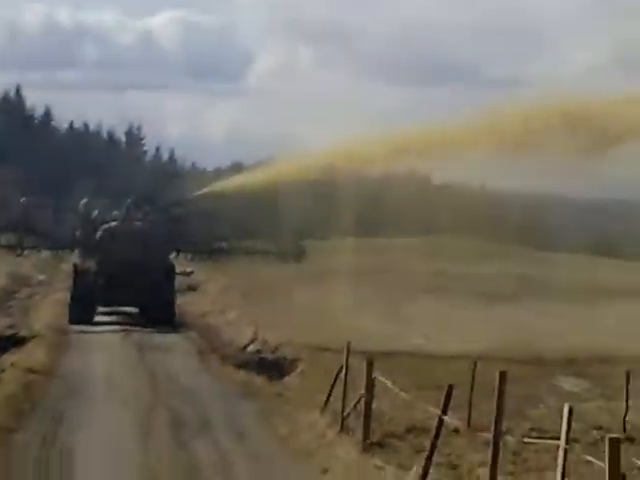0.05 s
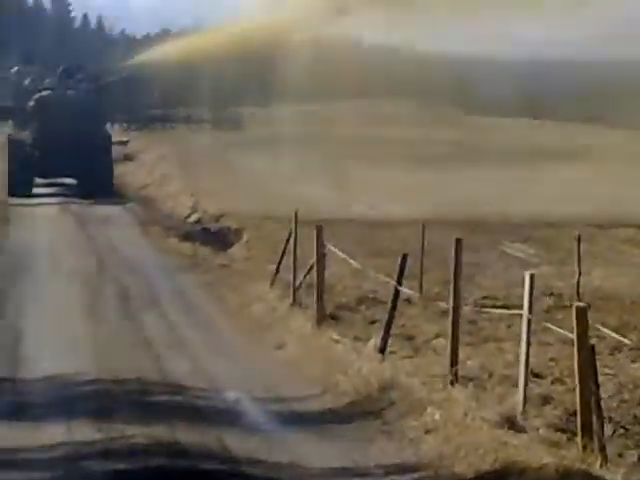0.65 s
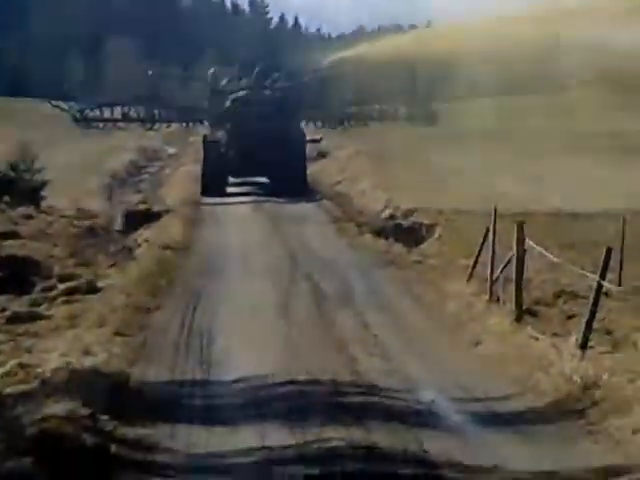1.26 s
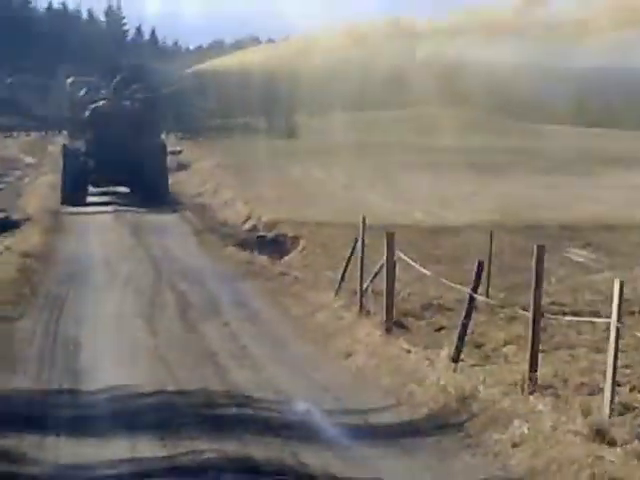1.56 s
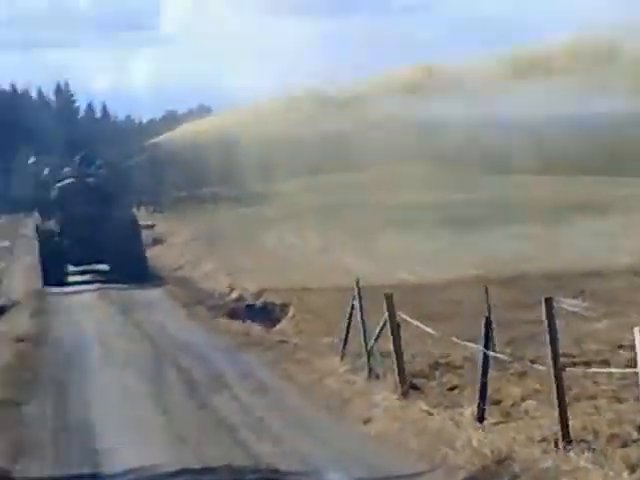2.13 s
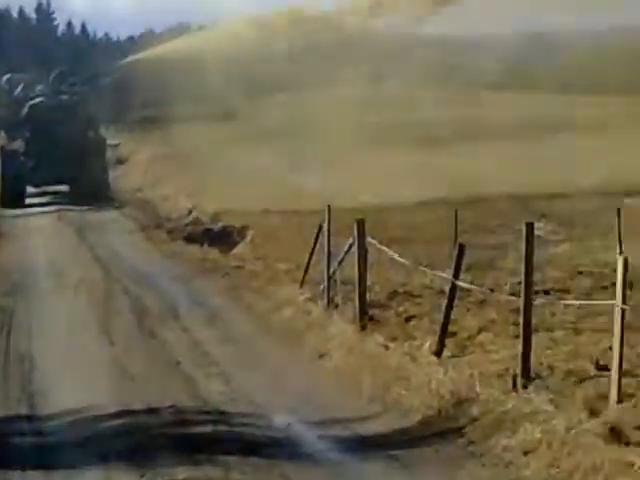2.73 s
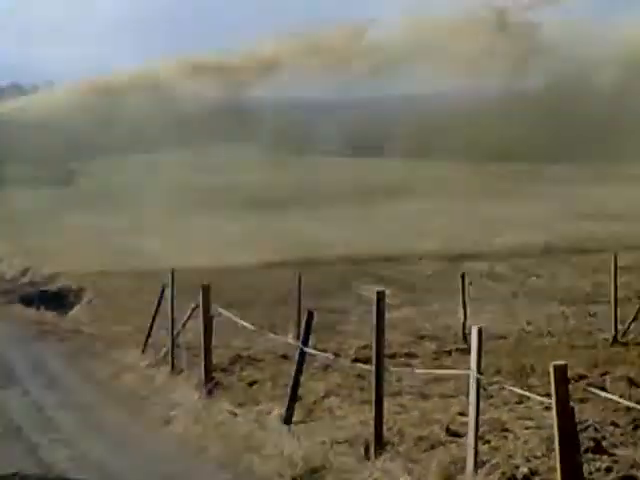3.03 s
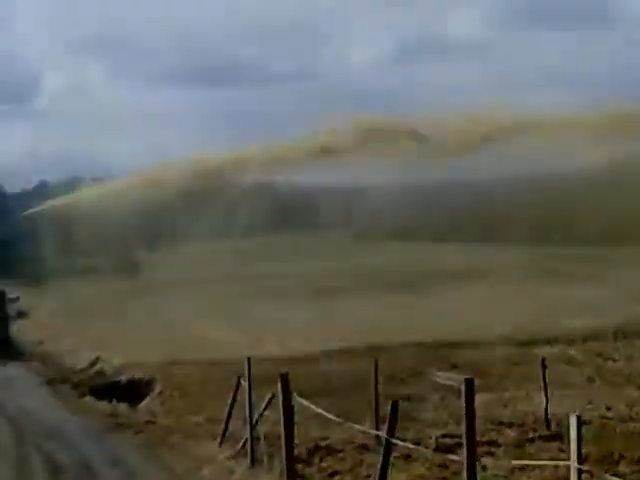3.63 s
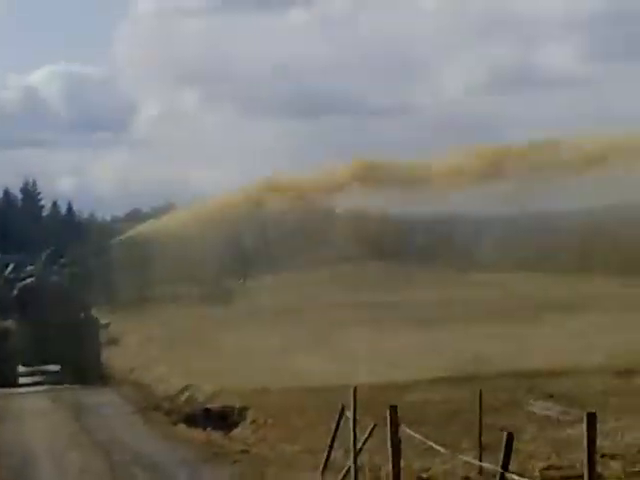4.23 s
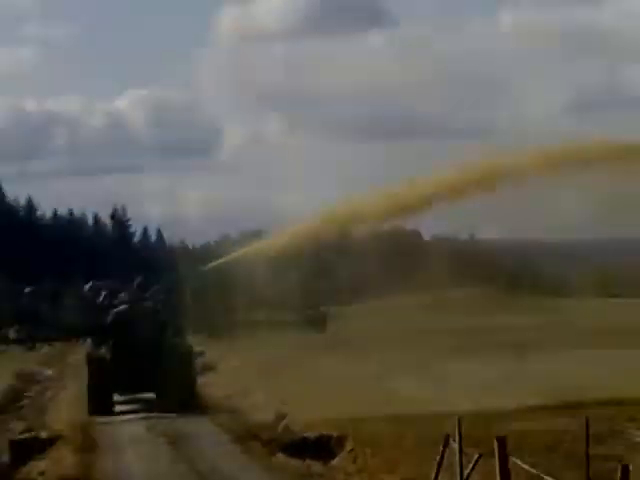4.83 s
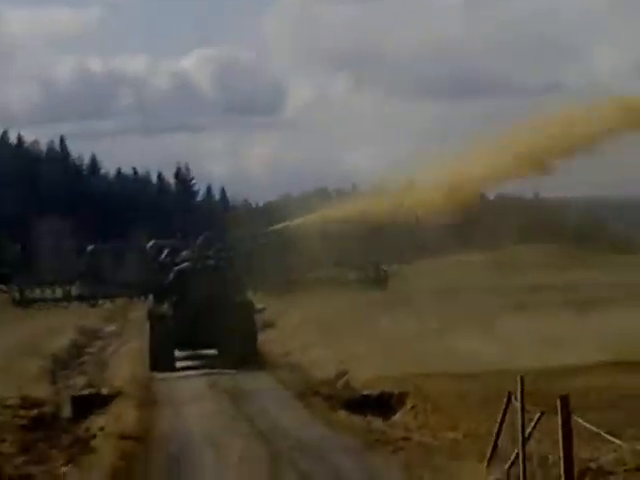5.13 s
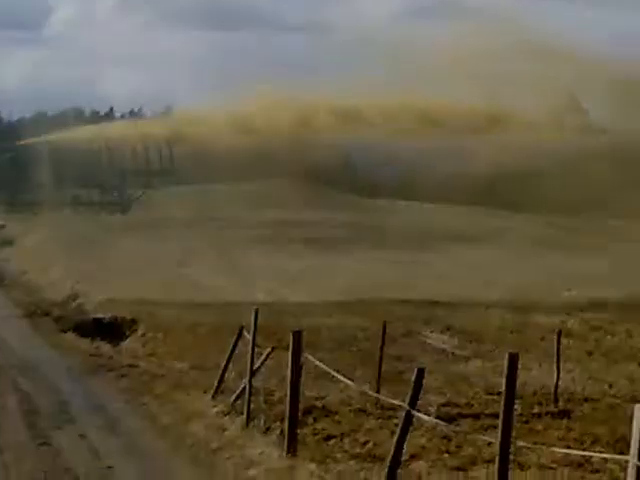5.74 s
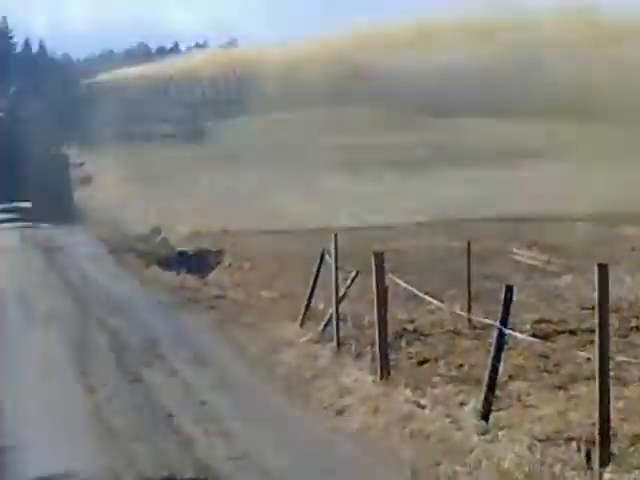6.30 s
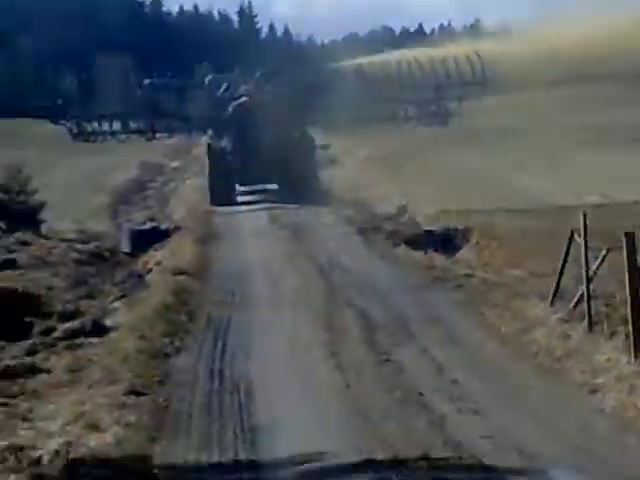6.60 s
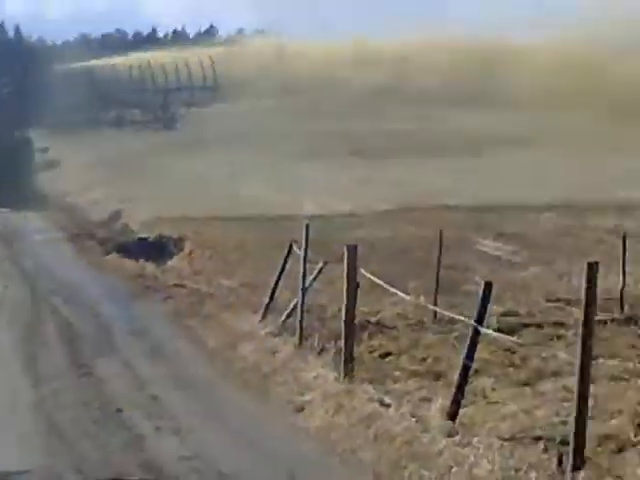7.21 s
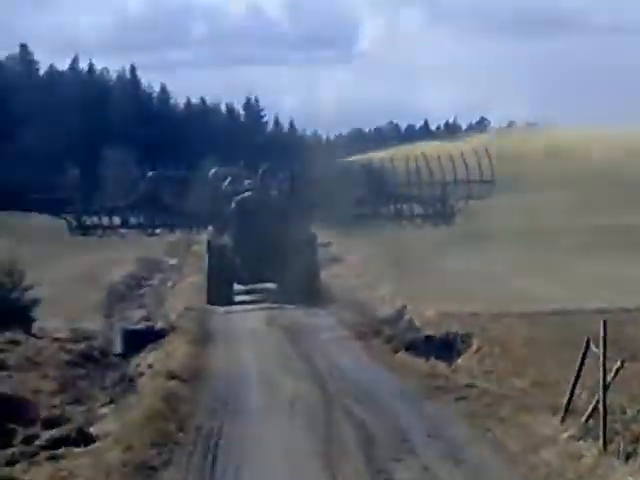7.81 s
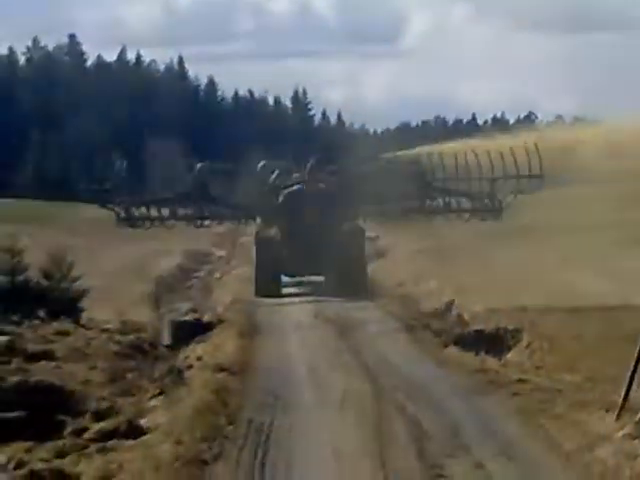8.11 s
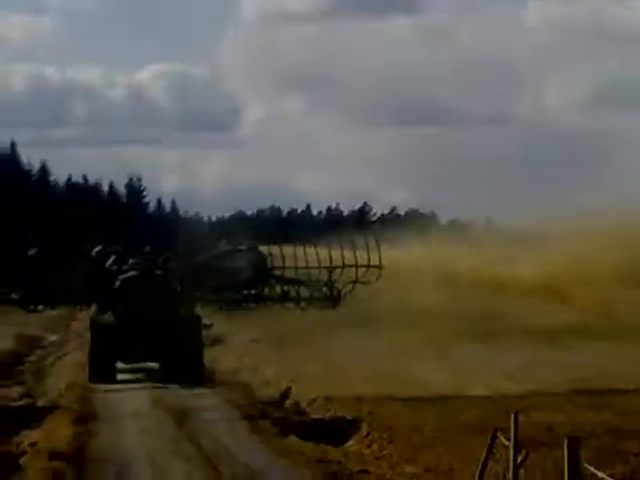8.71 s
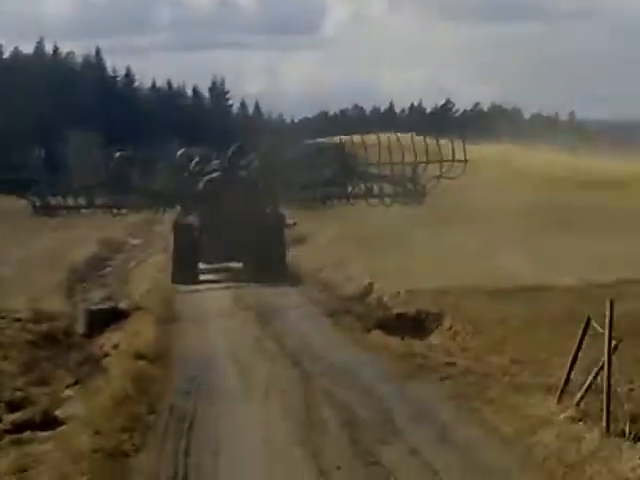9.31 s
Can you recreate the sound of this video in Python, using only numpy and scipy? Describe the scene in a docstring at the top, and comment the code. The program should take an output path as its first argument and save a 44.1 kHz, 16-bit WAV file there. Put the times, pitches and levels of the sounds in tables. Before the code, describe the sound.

A tractor and slurry spreader drone and whine some way off, while gusty wind buffets the microphone and shoes lightly scuff gravel.

```python
"""On a farm road, some way off, a tractor drives a slurry spreader. Periodic firing gives the exhaust
drone, and pump and gears on the same shaft add wavering whines. The pump howls, the engine knocks and
rattles, the turbocharger whistles and the turbulent jet rushes. Eddies in the wind buffet the
microphone, more and more towards the end, and shoes scuff lightly on the gravel close by."""
import sys
import numpy as np
from scipy import signal
from scipy.fft import rfft, irfft, next_fast_len
from scipy.io import wavfile
from scipy.ndimage import uniform_filter1d

SR = 44100
rng = np.random.default_rng(int(sys.argv[2]) if len(sys.argv) > 2 else 0)


def master_out(mix):
    """Clip the mix to full scale and print it as 16-bit PCM to the path in sys.argv[1]."""
    frames = np.transpose(np.atleast_2d(mix))
    ceiling = np.clip(frames, -1, 1)
    pcm = np.round(ceiling * 32767).astype(np.int16)
    wavfile.write(sys.argv[1], SR, pcm)


N = 412335
TIME = np.arange(N) / SR

# exhaust drone: (time [s], firing rate [Hz], level [dB])
EXHAUST = [(0, 70.2, -39.8), (1.3, 70.4, -39), (2.0, 70.1, -39.8), (3.4, 70.0, -38.8), (4.0, 70.0, -36.2),
           (4.8, 70.4, -36), (6.4, 70.2, -36.3), (8.3, 70.0, -39.8), (9.35, 70.0, -40.8)]

def exhaust_and_drivetrain():
    """Periodic firing sounds its fundamental; pump and gears, on one shaft, keep fixed ratios to it."""
    firing_hz, level_db = curves(EXHAUST)
    firing = phase(firing_hz * (1 + .001 * wander(rate=3)))
    drone = amp(level_db) * np.sqrt(2) * np.sin(firing)
    shaft = firing / 70  # phase of a 1 Hz tone at 70 Hz firing
    return drone + gear_mesh(shaft) + whines(shaft)


# how well the breeze carries gear whine and pump howl: (time [s], gain [dB])
PROPAGATION = [(0, 2), (0.7, -1), (1.3, -1.5), (1.7, 1), (2.5, 1.5), (2.75, -1), (3.0, 1.5), (3.4, -0.5),
               (3.95, 3), (4.6, -3.5), (5.0, 1.5), (5.35, -2), (5.7, 3.5), (6.1, -1.5), (7.3, -1.5),
               (7.8, -0.5), (8.6, -1), (9.35, -4.5)]

def gear_mesh(shaft):
    """Meshing teeth radiate a tone, which scattering in moving air broadens."""
    mesh_hz, level_db = 666, -44 + curves(PROPAGATION)[0]
    waver = phase(7 * wander(rate=7))
    return amp(level_db) * scattered_tone(mesh_hz * shaft + waver, width_hz=4.7, direct_share=.6)


# weaker pump and gear tones: (frequency at 70 Hz firing [Hz], level [dB], line width [Hz])
WHINES = [(134, -45, 0.83), (265, -55.5, 3.9), (377.4, -55, 9.4), (596, -55.5, 5.95), (613.6, -50.5, 9.2),
          (695, -60, 14), (793, -62.5, 10), (1622, -56.5, 8.88), (2370, -63.5, 12)]

def whines(shaft):
    """Varying load modulates each tone in frequency and amplitude."""
    out = np.zeros(N)
    for hz, db, width in WHINES:
        waver = phase(.576 * width * wander(rate=4.9))
        out += amp(db + 2.5 * wander(width)) * np.sin(hz * shaft + waver)
    return out


# spectrum of the pump housing: (frequency [Hz], relative level [dB])
HOWL_SPECTRUM = [(400, -36), (550, -13.5), (595, 1.5), (630, 6.5), (662, -2.5), (695, 5.5), (745, 2.5),
                 (800, -1.5), (880, -21), (1200, -45.5)]

def pump_howl():
    """Resonance of the housing confines the pump's noise to a narrow band."""
    level_db = -41.5 + curves(PROPAGATION)[0] + 2 * wander(rate=9.2)
    return amp(level_db) * colour(noise(), HOWL_SPECTRUM)


# strength of the knock: (time [s], level [dB])
KNOCK_LEVELS = [(0, -40.5), (1.5, -40.5), (2.9, -39), (4.0, -40.5), (5.6, -36.5), (6.4, -39.5),
                (9.35, -40.5)]
# its spectrum: (frequency [Hz], relative level [dB])
KNOCK_SPECTRUM = [(15, -16), (45, 15.5), (130, 6.5), (300, -5.5), (520, 3.5), (880, -1), (1150, 2),
                  (1450, -4.5), (1800, -18), (2600, -39.5), (4000, -83.5)]

def engine_knock(fade_db):
    """Rapid, irregular amplitude modulation of low noise is heard as knocking."""
    clatter = noise() * amp(fade_db + 1.6 * wander(rate=76))
    return amp(curves(KNOCK_LEVELS)[0]) * colour(clatter, KNOCK_SPECTRUM)


# the machine's upper bands: (time [s], rattle level [dB], jet level [dB])
TREBLE_LEVELS = [(0, -42, -58.5), (0.5, -46.5, -62), (1.0, -47.5, -63), (1.3, -50, -62), (1.8, -48, -64),
                 (2.3, -46.5, -60.5), (3.0, -42.5, -58.5), (3.3, -45.5, -61), (4.0, -46.5, -59.5),
                 (4.75, -45, -60.5), (5.3, -46.5, -59), (5.8, -44.5, -57.5), (6.2, -47.5, -63.5),
                 (6.75, -46.5, -60), (7.5, -46, -61), (8.05, -48.5, -62.5), (8.45, -47, -60),
                 (9.35, -50.5, -68.5)]
# their spectra: (frequency [Hz], relative level [dB])
RATTLE_SPECTRUM = [(900, -11), (1400, -1.5), (1650, 2.5), (1880, 2), (2100, -2), (2300, -1), (2460, -1.5),
                   (2620, -10), (3400, -22), (5000, -60.5)]
JET_SPECTRUM = [(1500, -16), (2900, 5), (3500, -3.5), (3950, 2), (4250, 2), (4600, 1.5), (5100, -3),
                (5600, -9), (6300, -10), (7100, -12.5), (8200, -16), (11000, -25.5), (16000, -27.5)]

def rattle_and_jet(fade_db):
    """Engine vibration and jet turbulence radiate broadband noise in spurts."""
    rattle_db, jet_db = curves(TREBLE_LEVELS)
    rattle = colour(noise() * amp(fade_db + 2.2 * wander(rate=36)), RATTLE_SPECTRUM)
    swell_db = 1.15 * wander(rate=5)
    jet = colour(noise() * amp(fade_db + wander(rate=67)), JET_SPECTRUM)
    return amp(rattle_db) * rattle + amp(jet_db + swell_db) * jet


# turbocharger whistle: (time [s], frequency [Hz], level [dB])
TURBO = [(0, 2490, -72), (0.65, 2483, -58), (1.05, 2490, -64), (1.35, 2505, -60), (1.75, 2490, -69),
         (2.6, 2490, -62), (3.2, 2470, -54.5), (3.5, 2487, -65), (4.25, 2493, -59), (4.5, 2489, -65),
         (5.0, 2508, -60), (5.3, 2477, -61), (5.8, 2457, -55.5), (6.6, 2488, -51.5), (6.85, 2477, -58.5),
         (7.2, 2520, -54), (7.8, 2477, -61), (9.35, 2486, -69)]

def turbocharger():
    """A fast rotor radiates a thin, wavering tone in a wider band of flow noise."""
    hz, db = curves(TURBO)
    angle = phase(hz + 5 * wander(rate=10.85))
    skirt = scattered_tone(angle + 2 * np.pi * 40 * TIME, width_hz=82, direct_share=0)
    gain = amp(db + 3 * wander(rate=2))
    whistle = scattered_tone(angle, width_hz=11, direct_share=.98)
    return gain * (whistle + amp(-2.5) * skirt)


# spectra of large and of small eddies: (frequency [Hz], relative level [dB])
RUMBLE_SPECTRUM = [(10, -42), (25, -55), (45, -9.5), (75, 1.5), (130, 0), (200, -6.5), (320, -27),
                   (700, -81.5), (2000, -102)]
BUFFET_SPECTRUM = [(60, -21.5), (150, -5.5), (260, 1.5), (400, -1.5), (560, -9), (800, -28), (1300, -27.5),
                   (2500, -41.5), (6000, -72), (16000, -90)]

def wind():
    """Turbulent pressure at the microphone: large eddies rumble, small ones buffet and die first."""
    flurry_db = 2.3 * wander(rate=10.6)
    rumble_db = eddy_level(flurry_db, column=0, fall_s=.016)
    buffet_db = eddy_level(flurry_db, column=1, fall_s=.014)
    heave = heaving(rumble_db, buffet_db)
    eddies = noise() * amp(3.7 * wander(rate=178))
    rumble = amp(rumble_db) * steadied(colour(eddies, RUMBLE_SPECTRUM), seconds=.068)
    buffet = amp(buffet_db) * steadied(colour(eddies, BUFFET_SPECTRUM), seconds=.034)
    return heave + rumble + buffet + tearing(eddies, buffet_db)


# breeze between gusts: (time [s], rumble level [dB], buffet level [dB])
BREEZE = [(0, -31.5, -49.5), (0.42, -42.5, -48.5), (0.75, -30.5, -42), (1.17, -36.5, -50),
          (1.65, -34, -47.5), (2.3, -44, -47.5), (2.7, -61, -52), (3.4, -36.5, -52), (3.8, -47.5, -54),
          (4.4, -45, -54), (4.65, -35.5, -43), (5.05, -40.5, -45.5), (5.65, -41.5, -60), (6.35, -33, -45),
          (6.9, -26, -28), (7.7, -31, -37.5), (8.65, -30.5, -32), (9.35, -31, -35)]
# gusts: (arrival [s], hold [s], rumble level [dB], buffet level [dB])
GUSTS = [(0.283, 0.051, -29.5, -37), (0.487, 0.018, -23.5, -31.5), (0.551, 0.027, -15, -20.5),
         (0.627, 0.025, -16, -29.5), (0.694, 0.046, -19, -27), (0.785, 0.027, -30, -32),
         (0.86, 0.05, -27, -41.5), (1.004, 0.033, -29, -41), (1.084, 0.012, -26, -37),
         (1.243, .02, -28, -35), (1.295, 0.095, -28, -30), (1.444, 0.029, -22.5, -30),
         (1.548, 0.054, -28, -29.5), (1.834, .02, -24, -55), (1.94, 0.028, -31, -52),
         (2.069, .025, -36, -36.5), (2.178, .03, -28.5, -40.5), (3.108, 0.015, -26, -60),
         (3.198, .02, -30, -62), (3.42, .2, -39, -60), (4.055, 0.049, -32.5, -45.5),
         (4.183, 0.096, -29.5, -38), (4.467, .025, -27.5, -45), (4.822, 0.059, -24, -28),
         (4.925, 0.023, -24, -36), (5.102, .02, -27, -50), (5.313, .04, -48, -37.5),
         (5.438, .02, -33, -40.5), (5.779, 0.021, -18, -23.5), (5.855, 0.023, -24, -30.5),
         (5.906, 0.26, -23, -33.5), (6.2, 0.039, -22.5, -38.5), (6.474, 0.068, -24, -29),
         (6.642, 0.048, -30, -27.5), (6.748, 0.12, -35, -26), (7.414, 0.027, -28, -27.5),
         (7.544, .04, -32, -30.5), (7.842, 0.076, -32, -27), (8.08, 0.04, -21.5, -27),
         (8.232, 0.051, -27.5, -26.5), (8.341, 0.063, -39, -26), (8.488, 0.031, -23, -31.5),
         (8.575, 0.033, -32, -29.5), (8.786, 0.36, -29.5, -26.5), (8.989, 0.036, -19.5, -24.5)]

def eddy_level(flurry_db, column, fall_s):
    """Incoherent sources add in power: breeze plus gusts, in dB, for one size of eddy."""
    rise_s = .012
    power = amp(curves(BREEZE)[column] + flurry_db) ** 2
    for arrival, hold, *levels in GUSTS:
        near = span(arrival - .1, arrival + hold + .3)
        t = TIME[near] - arrival
        envelope = np.exp(-(np.minimum(t, 0) / rise_s) ** 2 - np.maximum(t - hold, 0) / fall_s)
        power[near] += (amp(levels[column]) * envelope) ** 2
    return 10 * np.log10(power)


# spectrum of the heaving air: (frequency [Hz], relative level [dB])
HEAVE_SPECTRUM = [(8, -36.5), (20, -9.5), (32, 13.5), (48, 12.5), (60, -4), (72, -23), (110, -50.5)]

def heaving(rumble_db, buffet_db):
    """Inertia makes the deepest air motion lag the gusts; strong, dull ones drive it most."""
    slow_db = lagged(rumble_db)
    dullness_db = slow_db - lagged(buffet_db)
    level_db = -25 + .62 * slow_db + .53 * dullness_db + 1.3 * wander(rate=5.6)
    return amp(level_db) * steadied(colour(noise(), HEAVE_SPECTRUM), seconds=.082)


# sharp rips in the gusts: (time [s], peak level [dB], half length [s])
RIPS = [(0.554, -36, 0.004), (0.734, -21.5, 0.0014), (4.857, -30, 0.0023), (5.78, -27.5, 0.004),
        (6.502, -33.5, 0.0028), (6.865, -23, 0.0034), (7.419, -29, 0.004), (7.851, -30, .003),
        (8.338, -30.5, .003), (8.498, -28.5, 0.0041), (8.812, -30.5, .003), (8.845, -28, 0.0074),
        (9.062, -28, 0.0036)]
# spectrum of tearing air: (frequency [Hz], relative level [dB])
TEARING_SPECTRUM = [(300, -1), (600, 5), (850, 7.5), (1300, -4.5), (2000, -17.5), (3500, -44), (8000, -95)]

def tearing(eddies, buffet_db):
    """Flow separates at the edge of the microphone port when a strong gust lasts."""
    sustained_db = uniform_filter1d(buffet_db, size=4500)
    envelope = amp(1.99 * sustained_db + 13.3)  # nearly a square law
    for time, db, half_s in RIPS:
        envelope += amp(db) / (1 + ((TIME - time - half_s / 2) / half_s) ** 2)
    flutter = colour(eddies * amp(4.6 * wander(rate=23)), TEARING_SPECTRUM)
    return envelope * steadied(flutter, seconds=.082)


# single hard eddies: (time [s], peak level [dB], centre frequency [Hz])
THUMPS = [(0.562, -8, 151), (0.586, -8, 91), (0.646, -14.5, 134), (0.789, -11, 145), (4.854, -8.5, 360),
          (4.87, -11, 150), (5.793, -3.5, 112), (5.848, -8.5, 165), (5.932, -9.5, 153), (6.771, -11, 168),
          (8.998, -8, 180), (9.009, -12.5, 215)]

def thumps():
    """A vortex crossing the port is one dip of pressure between two shoulders."""
    out = np.zeros(N)
    for time, db, hz in THUMPS:
        near = abs(TIME - time) < .05
        offset_squared = (np.pi * hz * (TIME[near] - time)) ** 2
        out[near] -= amp(db) * (1 - 2 * offset_squared) * np.exp(-offset_squared)
    return out


# shoes on gravel: (time [s], grit level [dB], crunch level [dB])
SCUFFS = [(0.188, -52, -51), (0.918, -45, -56), (0.98, -58, -66), (1.598, -42, -54), (2.275, -35.5, -49.5),
          (2.769, -46, -49), (2.8, -51, -52), (2.85, -49, -55), (2.943, -42, -58), (3.598, -52, -50),
          (3.618, -44, -55), (4.115, -44.5, -45), (4.175, -48, -58), (4.243, -48, -53.5), (4.292, -45, -52),
          (4.329, -48, -59.5), (4.69, -58, -48), (4.987, -45, -61), (5.023, -48, -59.5), (5.422, -54, -52),
          (5.687, -54, -58), (6.417, -54, -50), (6.951, -49.5, -51), (6.99, -45.5, -47), (7.035, -50, -54),
          (7.097, -50, -55), (7.642, -40.5, -50), (7.684, -54, -64), (7.723, -46, -52.5),
          (7.807, -42.5, -54), (8.508, -54, -58), (9.244, -55, -55), (9.309, -49, -52)]
# spectra of full-range grit and a narrower crunch around 2-3 kHz: (frequency [Hz], relative level [dB])
GRIT_SPECTRUM = [(2000, 12), (3500, -9), (4500, 4), (5600, -2.5), (6900, 0), (8200, -10.5), (10500, -15),
                 (12500, -24.5), (16000, -16)]
CRUNCH_SPECTRUM = [(500, -34), (1200, -44), (2200, 20), (3000, 13.5), (4300, 6), (6000, -17), (10000, -53)]

def scuffs():
    """Random impacts of fine grains merge into a swell of noise; single stones tick above it."""
    rise_s, ticks_per_s = .02, 120
    grit, crunch = np.zeros((2, N))
    for time, grit_db, crunch_db in SCUFFS:
        near = span(time - .009, time + .25)
        age = (TIME[near] - TIME[near][0]) / rise_s
        swell = (age * np.exp(1 - age)) ** 3
        grit[near] += amp(grit_db) * swell
        crunch[near] += amp(crunch_db) * swell
    ticks = amp(22.5) * np.sign(noise()) * (rng.random(N) < ticks_per_s / SR)
    grains = noise() * amp(2.7 * wander(rate=180)) + ticks
    return grit * colour(grains, GRIT_SPECTRUM) + crunch * colour(grains, CRUNCH_SPECTRUM)


# spectrum of a dragged sole: (frequency [Hz], relative level [dB])
SCRAPE_SPECTRUM = [(1000, -20), (1700, 10), (2050, 6), (2500, -12), (3400, -12), (4500, -10), (5400, -24),
                   (8000, -48)]

def scrape():
    """Sliding friction of a sole on the road gives one longer rub."""
    middle_s, half_s, peak_db = 1.01, .055, -42
    envelope = amp(peak_db) * np.exp(-((TIME - middle_s) / half_s) ** 2)
    return envelope * colour(noise() * amp(1.8 * wander(rate=120)), SCRAPE_SPECTRUM)


def scattered_tone(angle, width_hz, direct_share):
    """Scattering spreads the power that does not arrive directly over the line width; rms 1."""
    direct, scattered = np.sqrt(2 * direct_share), np.sqrt(1 - direct_share)
    in_phase = direct + scattered * wander(width_hz)
    quadrature = scattered * wander(width_hz)
    return in_phase * np.sin(angle) + quadrature * np.cos(angle)


def colour(x, spectrum):
    """Filtering imposes the spectrum on x, with a steep roll-off above its last point; rms 1."""
    size = next_fast_len(N + 4096)
    hz, db = np.transpose(spectrum)
    bins = np.fft.rfftfreq(size, 1 / SR)
    gain = amp(np.interp(np.log(bins + 1), np.log(hz), db)) / np.maximum(bins / hz[-1], 1) ** 2
    return unit_rms(irfft(rfft(x, size) * gain, size)[:N])


def wander(rate):
    """Low-pass noise of rms 1 that fluctuates up to rate times a second."""
    size = 8192
    hz = np.fft.rfftfreq(size, N / SR / size)
    slow = irfft(rfft(rng.standard_normal(size)) / np.sqrt(1 + (hz / rate) ** 6))
    return unit_rms(np.interp(np.arange(N), np.linspace(0, N, size), slow))


def steadied(x, seconds):
    """Division by the running rms holds the level at 1 and leaves the quick peaks."""
    size = int(seconds * SR)
    power = uniform_filter1d(uniform_filter1d(x ** 2, size), size)
    return x / np.sqrt(abs(power) + 1e-9)


def lagged(db, seconds=.37):
    """A moving average of amplitude, mostly over the past, in dB."""
    size = int(seconds * SR)
    return 20 * np.log10(uniform_filter1d(amp(db), size, origin=size // 4))


def curves(rows):
    """Linear interpolation of each column over time."""
    times, *columns = np.transpose(rows)
    return [np.interp(TIME, times, column) for column in columns]


def span(start_s, end_s):
    """The samples between two times."""
    return slice(max(int(start_s * SR), 0), int(end_s * SR))


def phase(hz):
    """Phase is the integral of frequency."""
    return 2 * np.pi * np.cumsum(hz) / SR


def amp(db):
    """Decibels to gain."""
    return np.exp(np.asarray(db) * np.log(10) / 20)


def unit_rms(x):
    """Scales to rms 1."""
    return x / np.sqrt(np.mean(x ** 2) + 1e-20)


def noise():
    """White noise."""
    return rng.standard_normal(N)


def scene():
    """Superposition of distant machine, near feet and wind at one microphone."""
    machine = pump_howl()
    fade_db = .78 * wander(rate=10.2)  # turbulence on the path fades knock, rattle and jet together
    machine += engine_knock(fade_db) + rattle_and_jet(fade_db)
    machine += exhaust_and_drivetrain() + turbocharger()
    return (machine + scuffs() + scrape() + wind() + thumps())[None]


def record(dry):
    """Microphone saturation rounds the hardest thumps; short end fades, faint hiss and a band limit."""
    ceiling, fade_s, hiss_db, cutoff_hz = .72, .004, -72.5, 15750
    rounded = dry / (1 + (dry / ceiling) ** 6) ** (1 / 6)
    fades = np.minimum(np.minimum(TIME, TIME[::-1]) / fade_s, 1)
    lowpass = signal.firwin(511, cutoff_hz, window=("kaiser", 9), fs=SR)
    return signal.oaconvolve(fades * rounded + amp(hiss_db) * noise(), lowpass[None], "same")


dry = scene()
out = record(dry)
master_out(out)
```